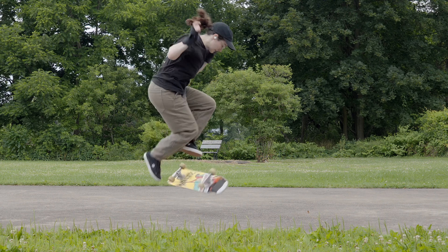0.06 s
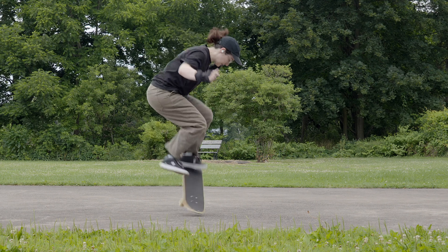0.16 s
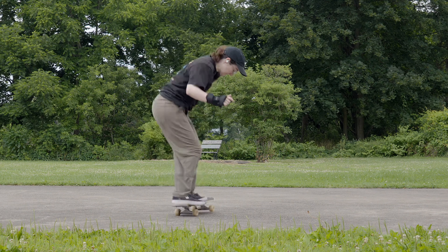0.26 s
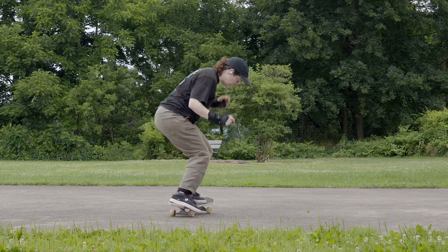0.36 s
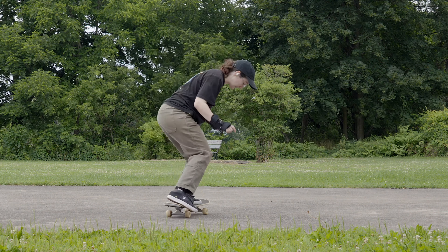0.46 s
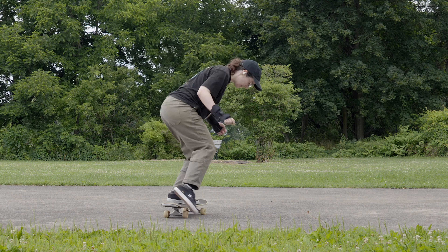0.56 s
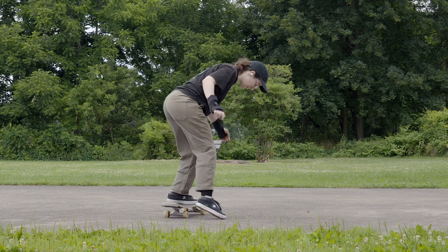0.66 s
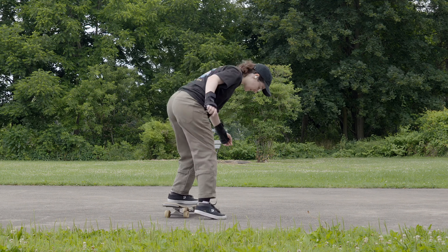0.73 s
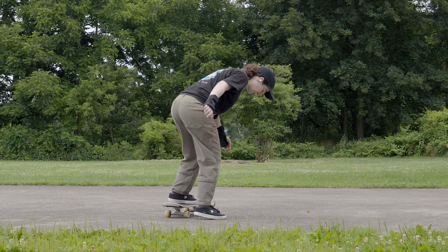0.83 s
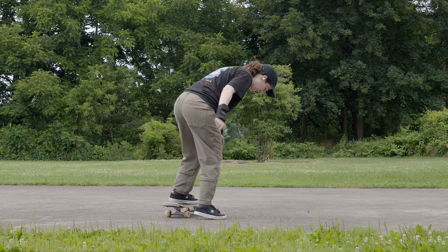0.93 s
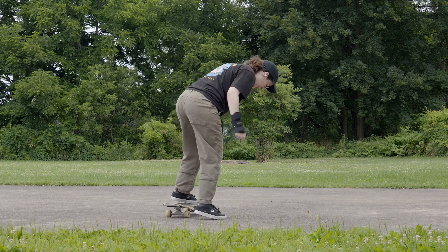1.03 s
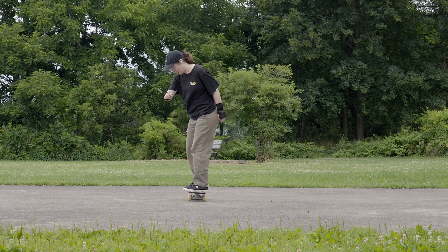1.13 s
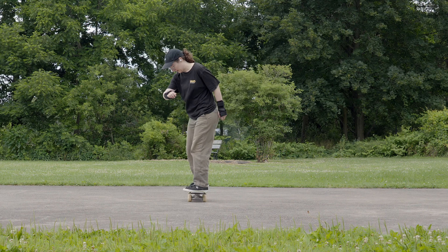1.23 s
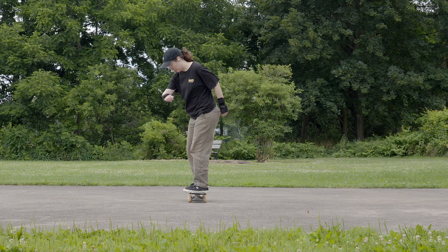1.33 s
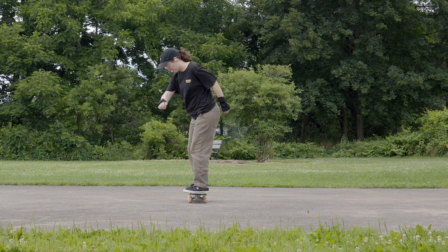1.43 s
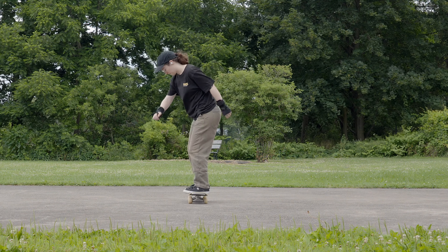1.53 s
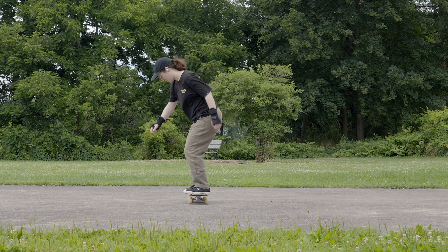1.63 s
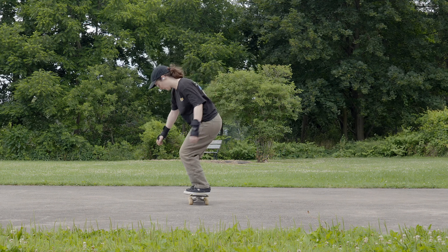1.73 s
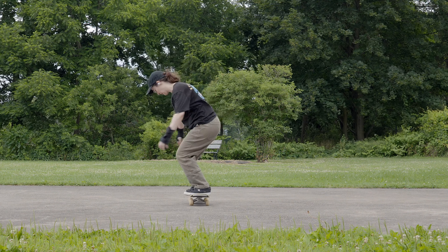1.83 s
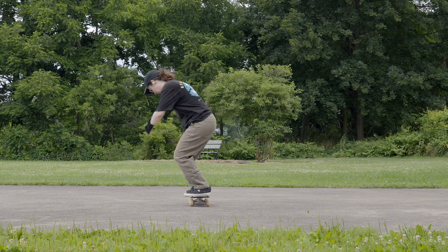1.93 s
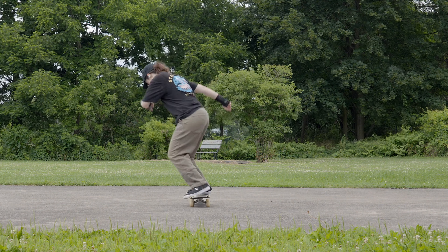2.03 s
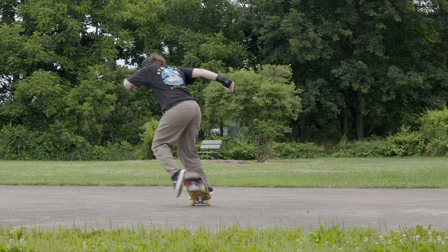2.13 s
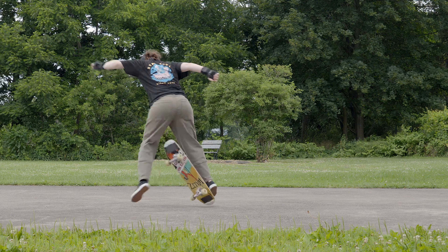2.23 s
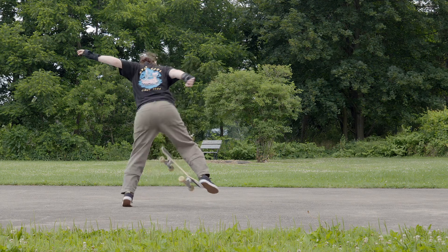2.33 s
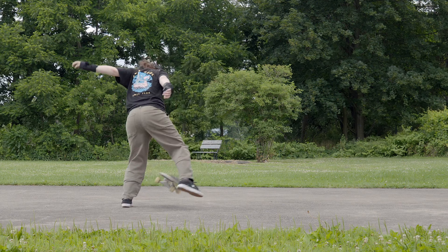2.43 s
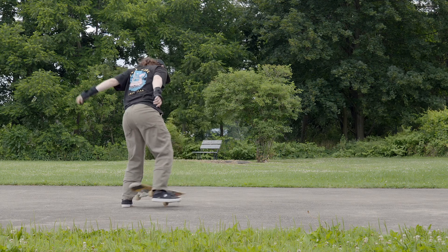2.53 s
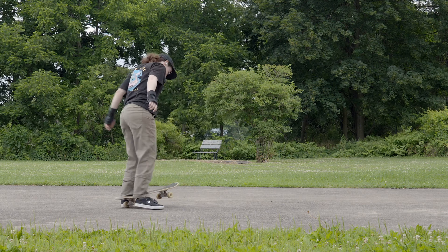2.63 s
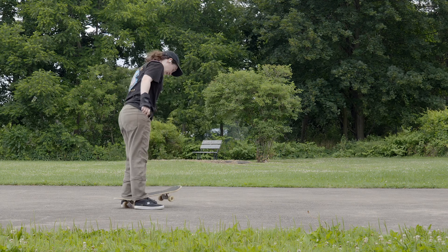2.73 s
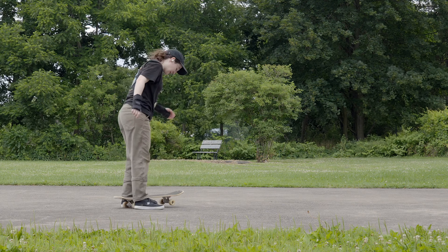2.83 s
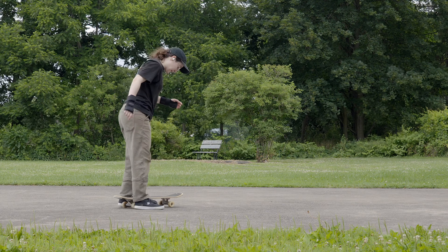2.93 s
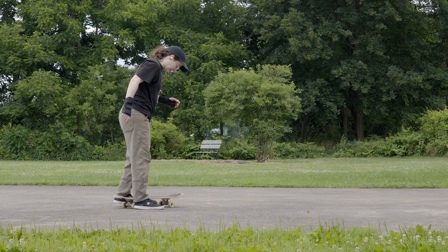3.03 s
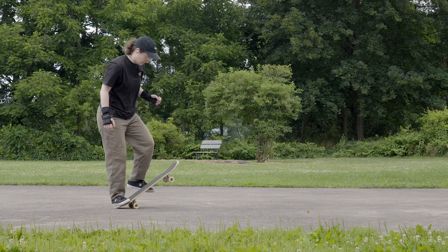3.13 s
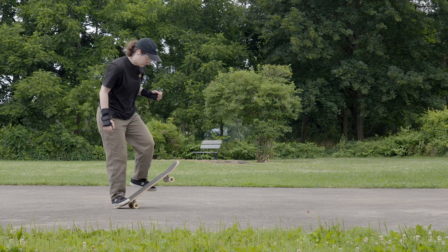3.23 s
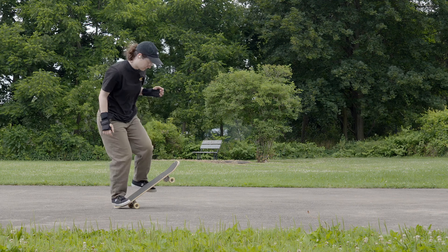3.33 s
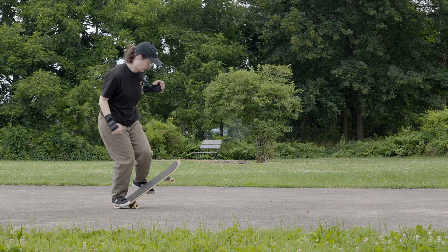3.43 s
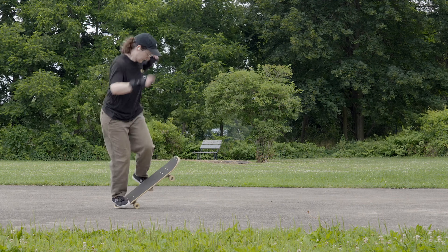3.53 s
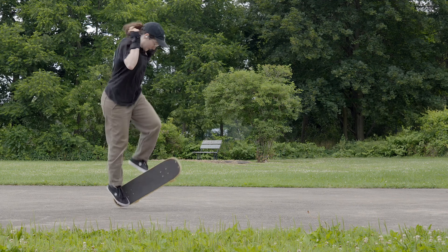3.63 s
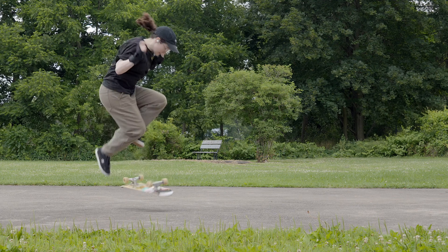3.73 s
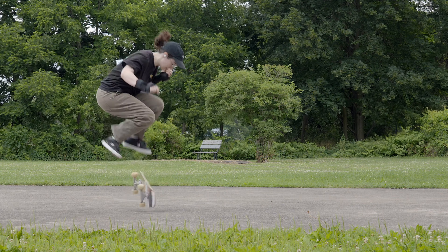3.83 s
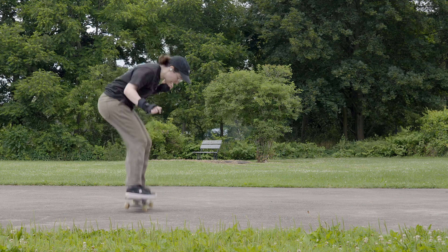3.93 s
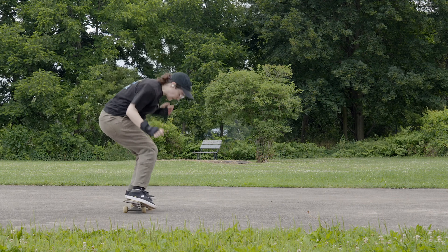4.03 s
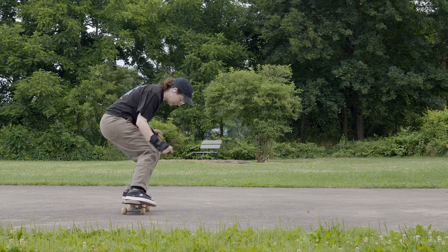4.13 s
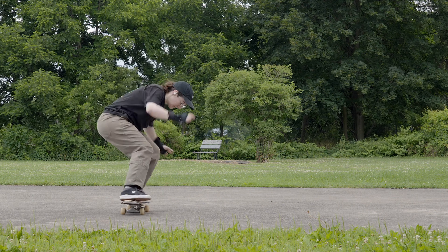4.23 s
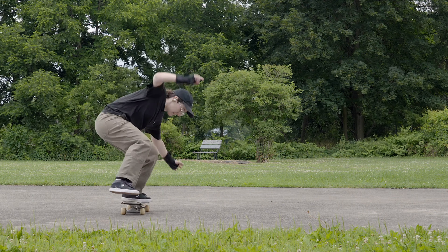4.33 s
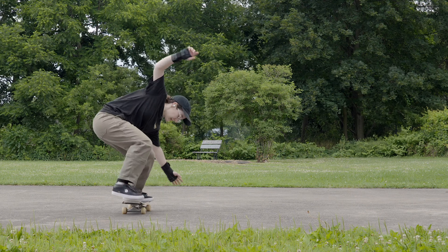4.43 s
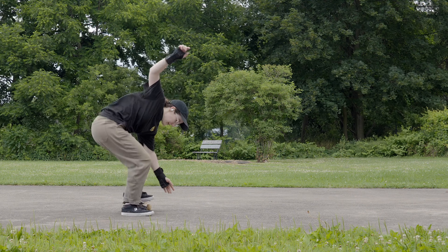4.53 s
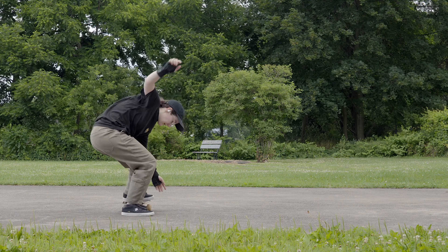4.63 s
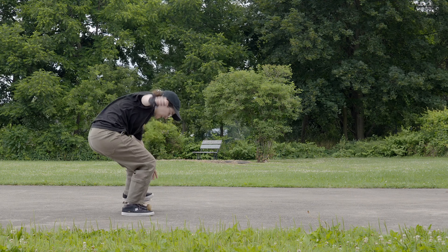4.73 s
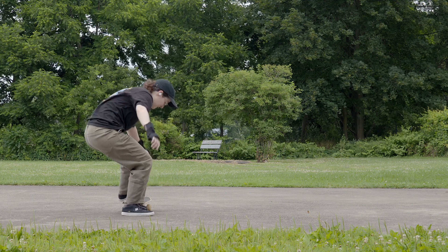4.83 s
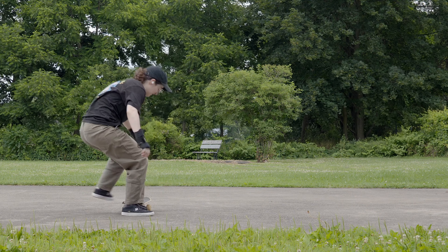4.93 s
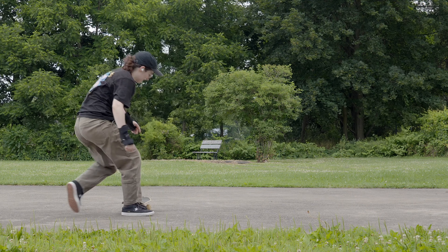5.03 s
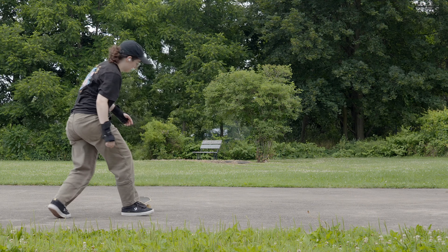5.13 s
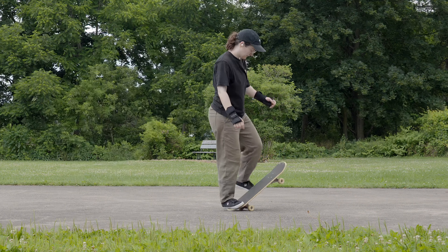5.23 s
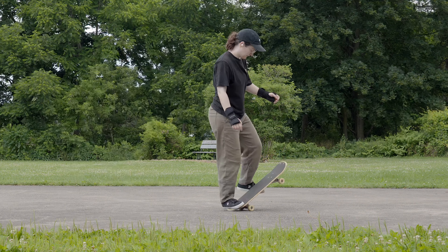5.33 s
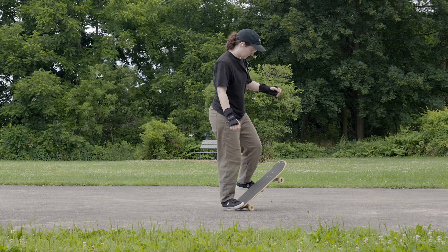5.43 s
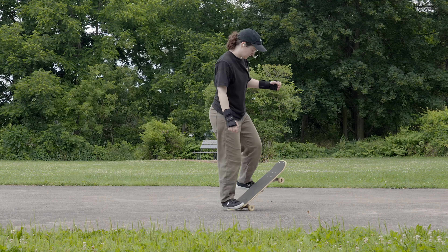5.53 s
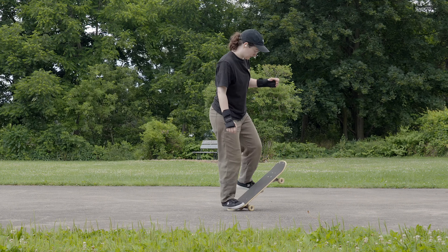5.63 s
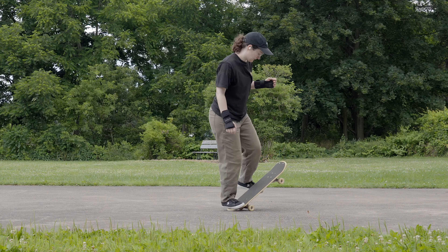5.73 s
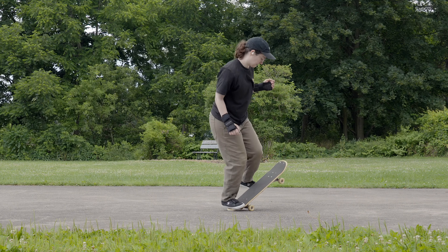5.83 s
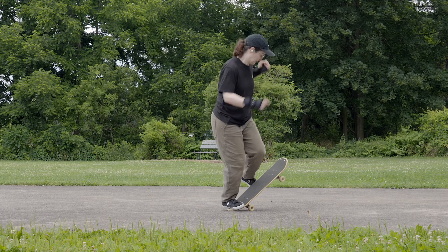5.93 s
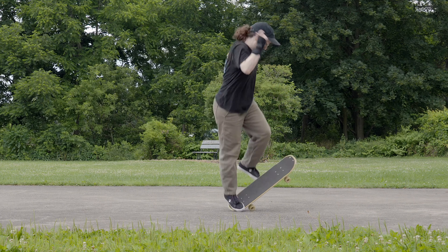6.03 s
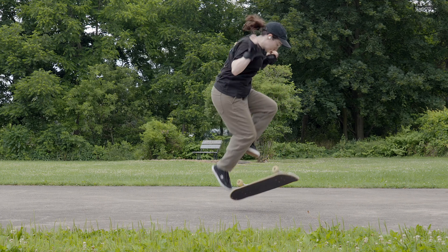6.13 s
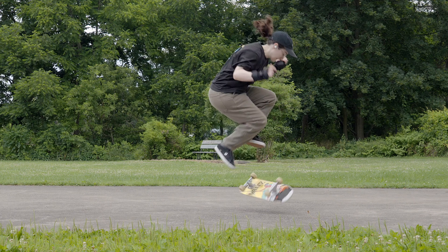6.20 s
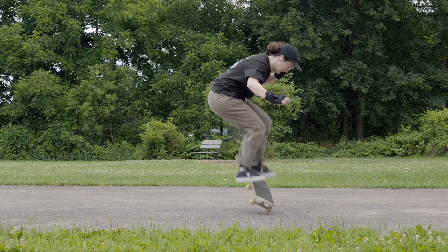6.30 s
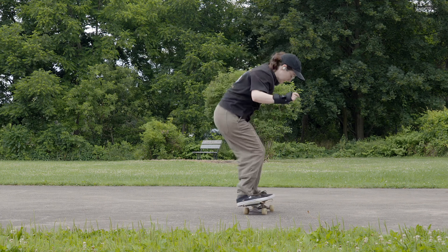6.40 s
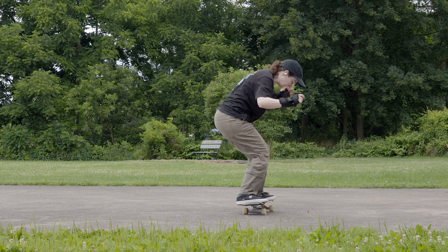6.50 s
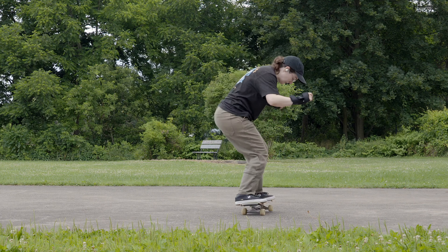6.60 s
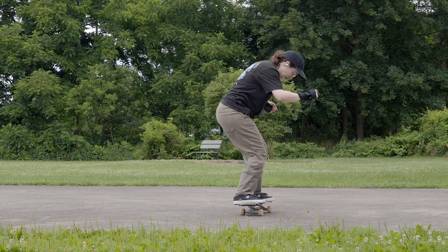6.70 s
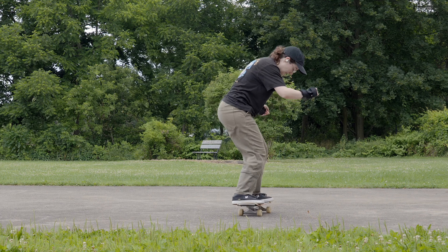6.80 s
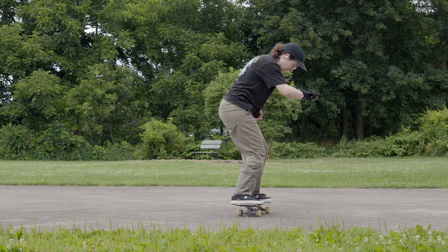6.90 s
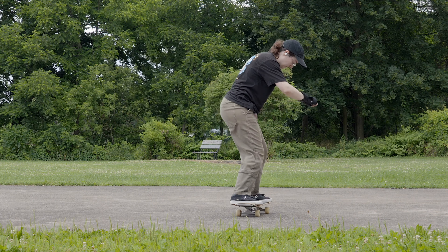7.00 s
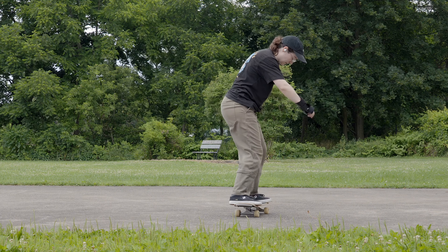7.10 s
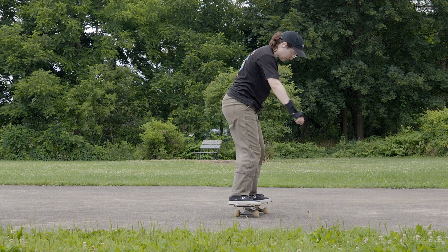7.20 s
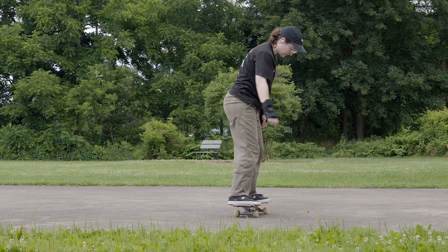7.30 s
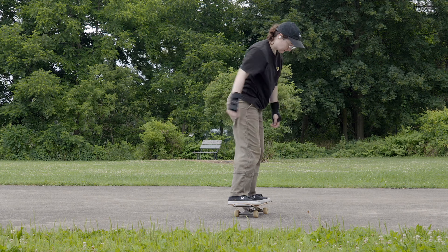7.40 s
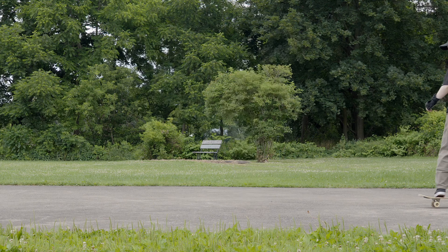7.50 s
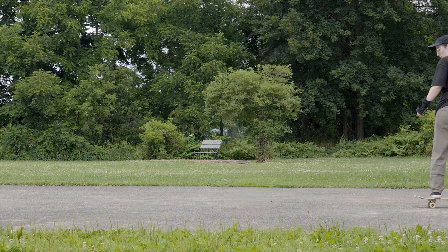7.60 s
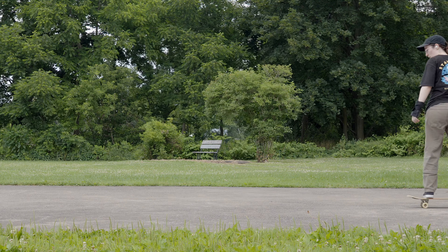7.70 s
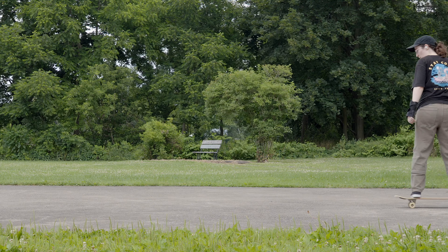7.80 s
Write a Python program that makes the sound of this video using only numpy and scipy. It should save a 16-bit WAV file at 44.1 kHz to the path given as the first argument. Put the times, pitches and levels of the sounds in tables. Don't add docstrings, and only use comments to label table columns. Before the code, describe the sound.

Outdoor park path, mono microphone several metres from a skateboard on asphalt. Quiet traffic rumble, wavering distant engines and faint leaves continue throughout. Tiny clacks open, then at 0.25-0.41 s a dense burst of scuffs, edge cracks, a loud tail snap and a dull stamp; wheels rattle away, with a lone clack at 0.5. Quiet until a bright snap at 2.26 s, followed by looser clatter at 2.6-2.75 and small taps to 3.05. Faint clicks at 3.7 precede a hard edge crack at 3.89 and the heaviest dull landing at 4.05, with a soft low puff and fading clacks. A muted foot step falls at 4.62. After calm, sharp cracks at 6.35 lead to a tight landing cluster at 6.43-6.49, then rattle. Very faint ticks come around 7.55-7.64. Every knock is short, woody and dry, answered by a soft, diffuse echo from trees.

```python
import sys
import numpy as np
from scipy import signal
from scipy.fft import rfft, irfft, next_fast_len
from scipy.io import wavfile

SR = 44100
rng = np.random.default_rng(int(sys.argv[2]) if len(sys.argv) > 2 else 0)


def inscribe(sig):
    pcm = np.round(np.clip(np.atleast_2d(sig).T, -1, 1) * 32767)
    wavfile.write(sys.argv[1], SR, pcm.astype(np.int16))


def undo_db(level):
    steps = np.asarray(level, float) / 20
    return 10 ** steps


N = 346626


def peak_one(x):
    return x / (np.abs(x).max() + 1e-12)


def rms_one(x):
    return x / np.sqrt(np.mean(x ** 2) + 1e-20)


def passed(x, hz, kind, order=2):
    return signal.sosfilt(signal.butter(order, hz, kind, fs=SR, output="sos"), x)


def ring(force, hz, t60):
    r, w = undo_db(-60 / (t60 * SR)), 2 * np.pi * hz / SR
    return signal.lfilter([0, np.sin(w)], [1, -2 * r * np.cos(w), r * r], force + 1e-18)


def drift(rate):
    r = np.exp(-80 * np.pi * rate / SR)
    slow = signal.lfilter([1], [1, -2 * r, r * r], rng.standard_normal(N // 40 + 2002))[2000:]
    return np.interp(np.arange(N) / 40, np.arange(len(slow)), rms_one(slow))


def at_hz(points, hz):
    corner_hz, level_db = np.transpose(points)
    return np.interp(np.log(hz), np.log(corner_hz), level_db)


CRACK_HITS = [(.2765, -21.5, 1090, 340), (.3095, -20, 1490, 304), (.3579, -14, 1560, 367),
              (2.2690, -21, 1500, 625), (2.6862, -19, 1610, 587), (3.8868, -12.5, 1450, 300),
              (3.8965, -22.5, 1440, 403), (4.0243, -21.5, 3000, 325), (4.0395, -23, 1140, 560),
              (4.061, -16, 1580, 580), (6.3510, -10.5, 2000, 720), (6.471, -14, 1540, 566),
              (7.6432, -33.5, 1630, 698)]
THUMP_HITS = [
    (.3033, -22.5, 1920, 251),
    (.3496, -14, 960, 432),
    (2.2925, -22.5, 1210, 670),
    (4.0515, -14, 960, 693),
    (6.46, -23.5, 1120, 400),
    (6.4644, -16.5, 1080, 400),
    (6.482, -23.5, 1490, 538),
]
SCUFF_HITS = [(.2487, -26.5, 2310, 587), (.3655, -15.5, 1600, 624), (.3760, -31.5, 2150, 394),
              (.4101, -29, 1860, 446), (2.7496, -38, 1440, 280), (3.0532, -40.5, 1560, 590),
              (6.3477, -17, 1446, 677), (6.3577, -20.5, 950, 620), (6.4673, -18, 1600, 577),
              (7.5400, -45.5, 2000, 397), (7.5622, -41, 1030, 674)]
CLACK_HITS = [(.0315, -35, 1100, 484), (.5074, -32.5, 1070, 430), (2.5953, -21.5, 1143, 422),
              (2.6241, -25, 1700, 480), (2.9033, -27.5, 1480, 660), (3.7130, -35, 950, 320),
              (4.0490, -20.5, 1100, 716), (4.0993, -26, 790, 593), (4.1964, -32, 790, 490),
              (4.2900, -39.5, 845, 500), (2.304, -28, 2130, 620), (7.5544, -44, 1170, 519)]
TAP_HITS = [(.074, -44, 1077, 370), (.2555, -26.5, 1480, 500), (.2635, -30.5, 1060, 340),
            (2.1722, -42, 1030, 530), (2.7183, -40, 1830, 544), (2.7902, -41, 1800, 290),
            (2.9787, -40, 1750, 550), (3.7115, -35.5, 2340, 300), (3.8845, -21, 1130, 520),
            (6.4345, -10, 1670, 700), (6.441, -18, 2410, 690), (6.4484, -31, 2200, 680)]
PAT_HITS = [
    (.3528, -11, 1170, 430),
    (.5867, -46, 1215, 432),
    (4.0545, -8, 793, 600),
    (4.0698, -36, 1044, 590),
    (4.3986, -46, 829, 704),
    (4.6189, -28.5, 910, 465),
    (6.1303, -44, 940, 220),
    (6.4912, -42, 1416, 585),
]
POP_HITS = [
    (.3387, -8, 880, 566),
    (2.2635, -10, 2210, 630),
    (2.2660, -21, 1600, 613),
    (6.4377, -20, 1660, 650),
]


def contacts():
    rows = []
    # (hits, dulled above Hz, thud dB, grit dB)
    single = [(TAP_HITS, 19500, -2.5, -16), (PAT_HITS, 3850, 3.9, -20), (POP_HITS, 4540, -17, -33)]
    for hits, top_hz, thud_db, grit_db in single:
        for s, db, hz, low_hz in hits:
            rows.append((s, db, top_hz, hz, thud_db, grit_db, low_hz))
    # (hits, dulled above Hz, thud dB, grit dB, rebound gap s, rebound loss dB, rebound pitch ratio)
    bouncing = [(CRACK_HITS, 12100, -9, -20, .0043, 8, 0.42),
                (THUMP_HITS, 12100, 2.5, -8, .005, 7, 1.75),
                (SCUFF_HITS, 19500, -2, -3.5, .006, 3, 1.16),
                (CLACK_HITS, 19500, -5, -14, .005, 0.5, 1.17)]
    for hits, top_hz, thud_db, grit_db, gap_s, loss_db, ratio in bouncing:
        for s, db, hz, low_hz in hits:
            back = s + gap_s * (1 + .12 * rng.standard_normal())
            rows.append((s, db, top_hz, hz, thud_db, grit_db, low_hz))
            rows.append((back, db - loss_db, top_hz, hz * ratio, thud_db + 2.7, grit_db - 4, low_hz * 1.15))
    return rows


# (frequency [Hz], level [dB], t60 [s])
DECK_MODES = [(215, -14, .030), (291, -7, .035), (400, 0, .030), (510, 0, .030), (650, 0, .028),
              (780, 1, .026), (860, 1, .028), (990, -2, .024), (1170, 0, .030), (1400, -3, .022),
              (1570, -2, .022), (1750, -1, .024), (2070, -1, .024), (2370, -2, .022), (2700, -4, .016),
              (3100, -6, .015), (3550, -8, .014), (3900, -9, .013), (4400, -11, .012)]


def knock(ring_hz, thud_db, grit_db, thud_hz, chance, spread):
    t = np.arange(len(chance)) / SR
    chatter = chance * np.abs(chance) * np.exp(-t / 0.0063)
    force = 0.076 * chatter
    force[0] += rng.choice([-1, 1])

    snap = force * np.exp(-t / .001)
    for stage in range(3):
        snap = np.diff(ring(snap, ring_hz, 3.5 / ring_hz), prepend=0)
    snap = peak_one(snap)

    thud, wood = .9 * ring(force, thud_hz, .028), 0
    for (hz, level_db, t60), luck in zip(DECK_MODES, spread):
        mode = undo_db(level_db + 2.5 * luck) * ring(force, hz * (1 + .02 * luck), t60)
        if hz < 700:
            thud = thud + 0.45 * mode * undo_db(-6.0 * abs(np.log2(hz / thud_hz)))
        else:
            wood = wood + mode * undo_db(-4.0 * abs(np.log2(hz / ring_hz)))
    wood = peak_one(passed(wood, 600, "high"))
    thud = undo_db(thud_db - 3) * peak_one(passed(thud, 283, "high", order=3))

    crack = force + 0.78 * chatter
    grit = passed(crack, [2500, 6200], "band") + 0.043 * passed(crack, [6000, 9500], "band")
    grit = undo_db(grit_db - 1) * peak_one(grit)
    shake = peak_one(passed(chance[::-1] * np.exp(-t / 0.0044), [650, 3300], "band"))
    clack = peak_one(snap + .55 * wood + .4 * shake)

    scrape = peak_one(passed(crack, [700, 3200], "band", order=1))
    toward = clack + thud + grit
    around = 0.41 * snap + 0.93 * scrape + 0.062 * wood + 0.42 * thud + 1.1 * grit
    return toward, around


def board():
    size = 2800
    out = np.zeros((2, N + size))
    for s, level_db, top_hz, *touch in contacts():
        chance = rng.standard_normal(size)
        spread = rng.standard_normal(len(DECK_MODES))
        hit = np.array(knock(*touch, chance, spread))
        at = round(s * SR)
        out[:, at:at + size] += undo_db(level_db - 0.25) * passed(hit, top_hz, "low")
    return passed(out[:, :N], 126, "high")


# (time [s], peak level [dB])
WEIGHT_DROPS = [
    (0.354, -46),
    (4.054, -32.5),
    (4.62, -43.5),
    (6.47, -37),
]


def stomps(low_hz, push_s):
    out, t = np.zeros(N), np.arange(4000) / SR
    for s, level_db in WEIGHT_DROPS:
        push = rng.standard_normal(len(t)) * np.exp(-t / push_s)
        puff = passed(push, [75, low_hz], "band")
        out[round(s * SR):][:len(t)] += undo_db(level_db) * peak_one(puff)
    return out


# (time [s], level [dB], t60 [s])
JOLTS = [
    (.250, -39, 0.28),
    (.39, -45, 0.76),
    (2.31, -49, 0.37),
    (2.70, -48, 0.52),
    (2.93, -51, .8),
    (3.901, -42, 0.48),
    (4.074, -46.5, 0.69),
    (6.50, -42.5, 0.59),
]


def rattle():
    t = np.arange(N) / SR
    struck = rng.random(N) < 2500 / SR
    height = undo_db(2 * np.minimum(rng.exponential(1, N), 4))
    ticks = struck * height * rng.choice([-1, 1], N)
    dealt = rng.integers(0, 12, N)
    grains = 0
    for k, hz in enumerate(np.geomspace(650, 3000, 12)):
        grains = grains + np.sqrt(hz) * ring(ticks * (dealt == k), hz, 5.1 / hz)
    dying = sum((t > s) * undo_db(db - 60 * np.maximum(t - s, 0) / t60) for s, db, t60 in JOLTS)
    return rms_one(grains) * dying


# (arrival [s], rise [s], t60 [s], level [dB], dulled above [Hz])
ECHO_CLOUDS = [
    (.010, .008, 0.13, -14, 3000),
    (0.062, 0.0092, .16, -16, 14000),
    (0.086, .030, 0.65, -20, 5000),
    (.200, .060, .70, -26, 4000),
]
# (frequency [Hz], level [dB])
ECHO_COLOUR = [(150, 2.5), (500, -0.5), (1200, -0.5), (2200, 2), (3500, -3), (6000, -2), (9000, -0.5),
               (12000, -1), (15000, 7)]


def trees(x):
    t, answer = np.arange(SR) / SR, 0
    for arrival, rise, t60, level_db, dull_hz in ECHO_CLOUDS:
        late = np.maximum(t - arrival, 0)
        swell = 1 - np.exp(-late / max(rise, .001))
        cloud = swell * undo_db(-60 * late / t60) * rng.standard_normal(SR)
        dulled = passed(cloud, dull_hz, "low", order=1)
        answer = answer + undo_db(level_db) * dulled / np.sqrt(np.sum(cloud ** 2))
    size = next_fast_len(N + SR)
    colour = undo_db(at_hz(ECHO_COLOUR, np.arange(size // 2 + 1) * SR / size + 1))
    return irfft(rfft(x, size) * rfft(answer, size) * colour, size)[:N]


def engine(start, end, hz, glide, level_db, waver_db, waver_hz):
    t = np.arange(N) / SR
    rise_s, fall_s = 0.21, 0.032
    heard = np.clip(np.minimum((t - start) / rise_s, (end - t) / fall_s), 0, 1)
    phase = 2 * np.pi * np.cumsum(hz + glide * (t - start) + waver_hz * drift(5.25)) / SR
    return np.sqrt(2) * heard * undo_db(level_db + waver_db * drift(4.9)) * np.sin(phase)


# (start [s], end [s], start pitch [Hz], glide [Hz/s], level [dB])
PASSING_ENGINES = [
    (-.3, .5, 73, 4, -59),
    (.8, 1.13, 73.5, 3, -59),
    (.55, 1.13, 200, 1.5, -64),
    (.85, 1.13, 149, -3, -64),
    (1.6, 3.12, 43.5, -1.3, -63),
    (3.1, 3.8, 51, 8, -60),
    (3.2, 4.8, 74.8, -5.8, -67),
    (5.22, 6.6, 113, .2, -61.5),
    (6.75, 7.48, 110.5, -10, -61),
    (5.9, 7.48, 172, 4.5, -65),
]


def engines():
    return sum(engine(*e, waver_db=2.5, waver_hz=1.74) for e in PASSING_ENGINES)


# (start [s], rumble [dB], road roar [dB], leaves [dB])
PARK_MOMENTS = [
    (0, -57, -55.5, -64),
    (1.135, -60.5, -55.5, -60),
    (3.13, -61.5, -56.5, -61),
    (5.21, -58, -55.5, -62.5),
    (7.49, -61.5, -57.5, -65),
]
# (time [s], level [dB])
ROAD_SWELL = [(0, 0.6), (.7, 0), (1.13, -0.7), (2.2, 0.3), (3.0, 0.5), (3.12, -1.4), (3.7, -0.8),
              (4.8, -0.8), (6.2, -0.04), (7.3, -.5), (7.6, -0.7), (7.86, -2.5)]


def background_db():
    t = np.arange(N) / SR
    start, *levels = np.transpose(PARK_MOMENTS)
    moment = np.maximum(np.searchsorted(start, t, side="right") - 1, 0)
    swell = np.interp(t, *np.transpose(ROAD_SWELL))
    shares = 0.99, 1, 0.54
    return [db[moment] + share * swell for db, share in zip(levels, shares)]


# (frequency [Hz], level [dB per Hz])
BED_COLOUR = [(13, -34), (22, -12.5), (49, -8.5), (80, -4.5), (112, -2.5), (200, -4), (328, -8),
              (356, -8.5), (636, -8), (771, -7), (1070, -8), (1380, -11.5), (5610, -22), (16000, -39.5)]


def park(patchy_db):
    groups, together = [0, 0, 0], drift(1.5)
    edges = 22 * 2 ** np.arange(0, 9.7, 1 / 3)
    white = rng.standard_normal((2, N + SR))
    for k, (low, high) in enumerate(zip(edges, edges[1:])):
        band = passed(white[k % 2], [low, high], "band")[SR:]
        hz = np.sqrt(low * high)
        group = int(hz > 280) + int(hz > 2000)
        patches_db = patchy_db * (.5 * together + drift(7.4))
        groups[group] = groups[group] + band * undo_db(at_hz(BED_COLOUR, hz) + patches_db)
    return sum(undo_db(db) * rms_one(g) for db, g in zip(background_db(), groups))


def scene():
    hits, spread = board()
    weight = stomps(low_hz=213, push_s=0.017)
    far = engines() + park(patchy_db=1.0)
    return (hits + weight + rattle() + trees(spread) + far)[None]


def roll_off(x):
    return signal.sosfilt(signal.butter(12, 16470, fs=SR, output="sos"), x)


def record(dry):
    top_hz = 16200
    cut = signal.sosfilt(signal.cheby2(12, 70, top_hz * 1.03, fs=SR, output="sos"), dry)
    return roll_off(cut)


dry = scene()
out = record(dry)
inscribe(out)
```